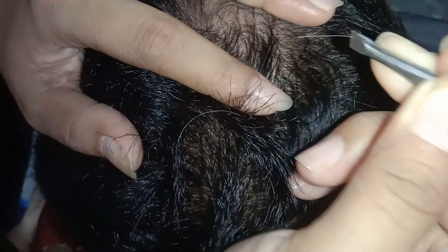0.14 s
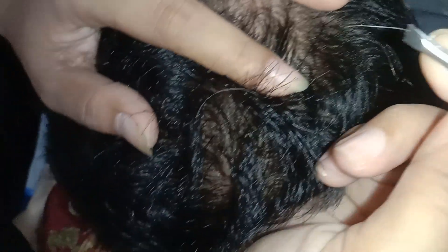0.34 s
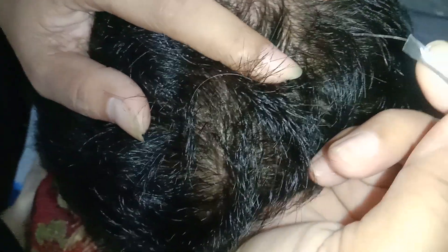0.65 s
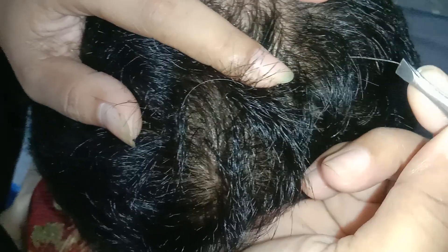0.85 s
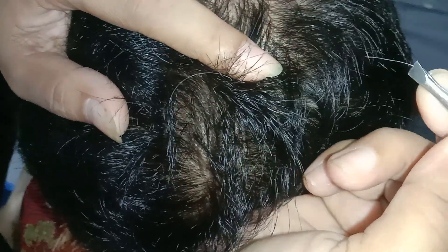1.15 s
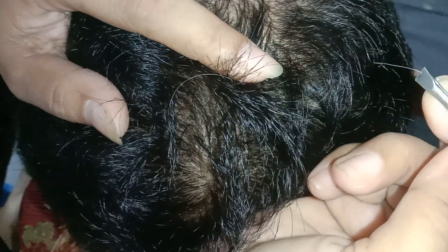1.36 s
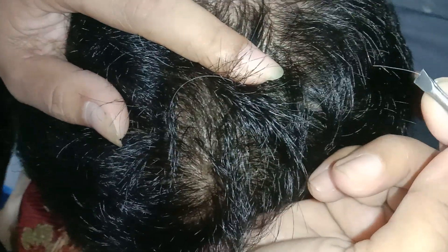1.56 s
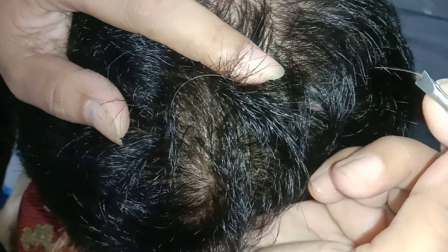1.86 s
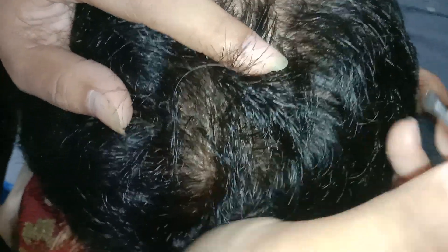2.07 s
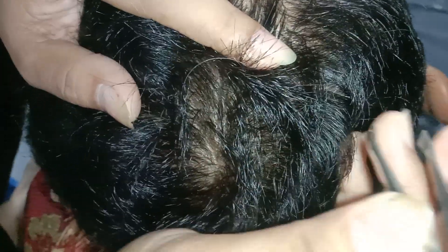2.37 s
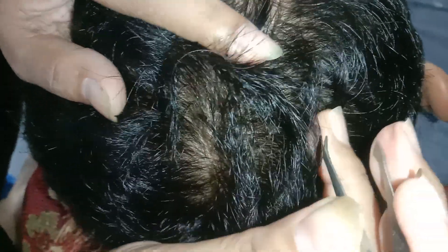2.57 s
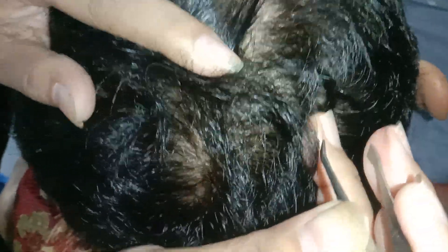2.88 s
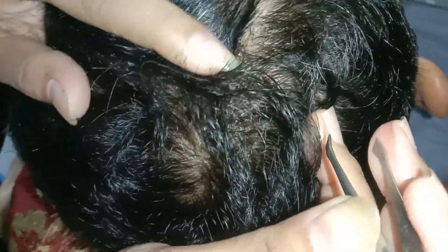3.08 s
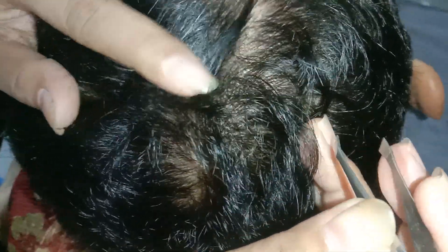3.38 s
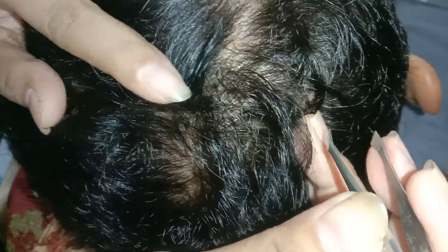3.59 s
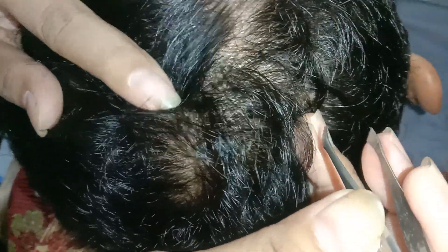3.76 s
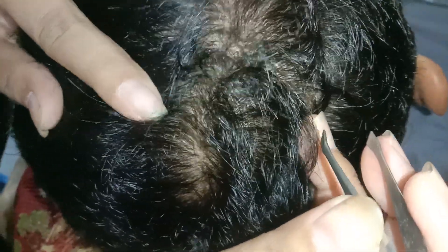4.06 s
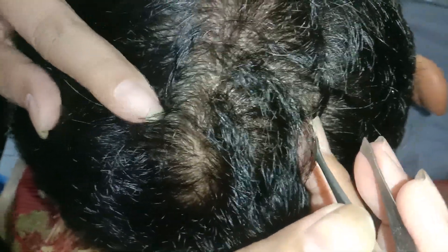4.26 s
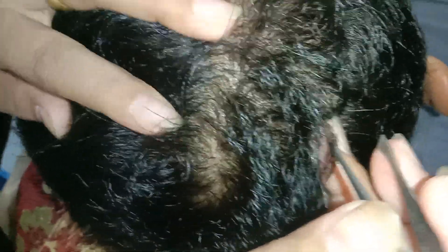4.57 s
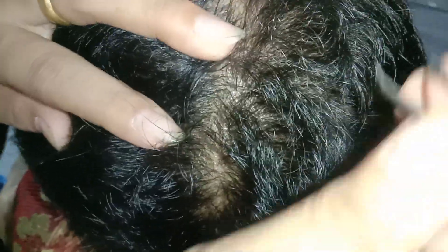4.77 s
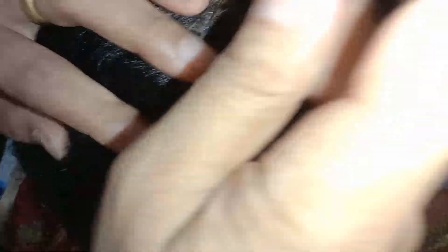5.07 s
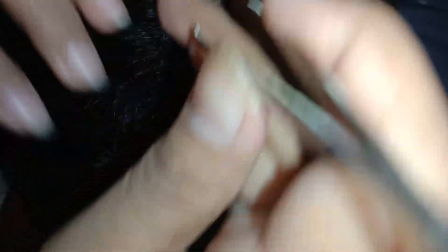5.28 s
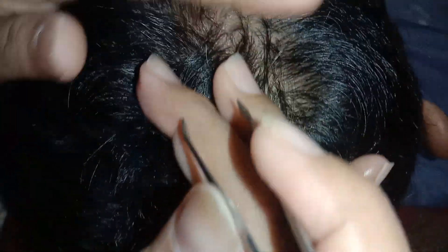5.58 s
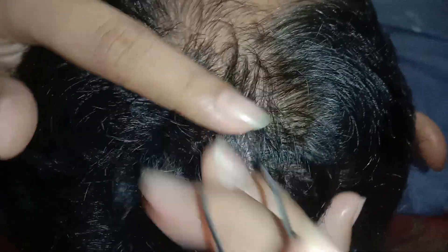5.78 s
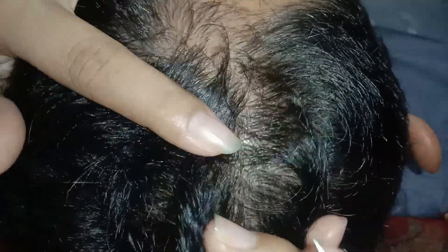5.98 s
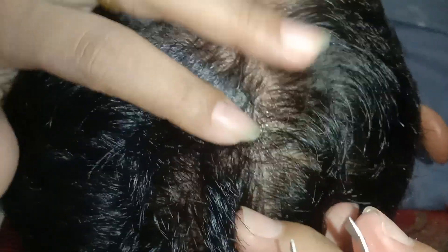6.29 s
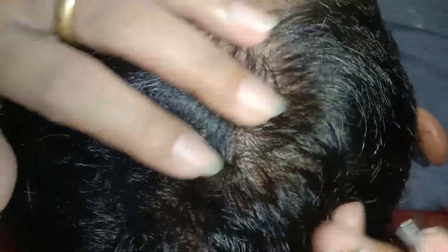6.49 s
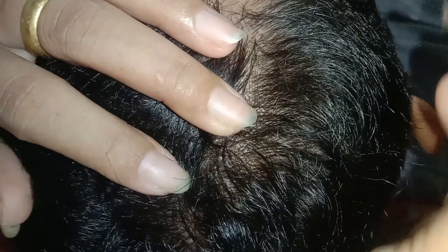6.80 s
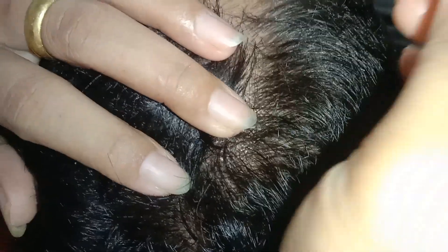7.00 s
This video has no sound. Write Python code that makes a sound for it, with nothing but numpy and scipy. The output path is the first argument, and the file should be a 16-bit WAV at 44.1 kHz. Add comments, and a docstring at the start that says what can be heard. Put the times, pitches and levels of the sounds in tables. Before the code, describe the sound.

Several small birds chirp and whistle in dense, quick bouts of high gliding notes, some pure, some hoarse. A distant rooster crows once between one and three seconds, its voice breaking at the end. Traffic rumbles low and lumpy far away, with dull soft knocks mostly in the second half. Sounds like just outside a bare, echoing room; the microphone's noise suppression makes the pauses sink almost to silence.

```python
"""Just outside a bare, echoing room: small birds chatter in quick gliding notes; a rooster crows once far away.
Under them lie a lumpy low rumble of distant traffic, a swell of deep hum and a faint wavering whine, with dull
knocks, two brief soft tones and a longer steady whistle under the crow's first syllable. Voices are sine
partials, some with hiss, in a sparse-tap echo; rumble, whine and knocks are shaped noise, the hum a sine.
A noise suppressor and a band limit end the chain."""
import sys
import numpy as np
from scipy import signal
from scipy.fft import rfft, irfft
from scipy.io import wavfile
from scipy.ndimage import uniform_filter1d

SR = 44100
rng = np.random.default_rng(int(sys.argv[2]) if len(sys.argv) > 2 else 0)


def master_out(mix):
    """Clip the mix to full scale and print it as 16-bit PCM to the path in sys.argv[1]."""
    frames = np.transpose(np.atleast_2d(mix))
    ceiling = np.clip(frames, -1, 1)
    pcm = np.round(ceiling * 32767).astype(np.int16)
    wavfile.write(sys.argv[1], SR, pcm)


N = 314874


def amp(db):
    """Decibels to gain."""
    return 10 ** (np.asarray(db) / 20)


def evened(x):
    """Scales to rms 1."""
    return x / np.sqrt(np.mean(x ** 2) + 1e-20)


def read(points, hz):
    """Reads a table on a log-frequency axis."""
    point_hz, value = np.transpose(points)
    return np.interp(np.log(hz + 1), np.log(point_hz + 1), value)


def along(rows, t_s):
    """Reads every column of a curve at times t_s."""
    row_s, *columns = np.transpose(rows)
    return [np.interp(t_s, row_s, column) for column in columns]


def add(mix, start_s, sound):
    """Mixes a sound in at start_s."""
    part = mix[max(round(start_s * SR), 0):][:len(sound)]
    part += sound[:len(part)]


def wander(hz):
    """Random drift of rms 1: noise rolled off above about hz."""
    f_hz = np.fft.rfftfreq(N, 1 / SR)
    spectrum = rfft(rng.standard_normal(N)) / (1 + (f_hz / hz) ** 2)
    return evened(irfft(spectrum, N))


def coloured(points):
    """Steady noise of rms 1 with the given spectrum."""
    gain = amp(read(points, np.fft.rfftfreq(N, 1 / SR)))
    return evened(irfft(rfft(rng.standard_normal(N)) * gain, N))


def room(x, direct_db, gap_s):
    """Direct sound plus sparse taps of random sign; the tail builds over gap_s, each band dying at its own speed."""
    # reverberation time: band_hz, t60_s
    decay = [(700, 0.37), (2000, 0.58), (4000, 0.59), (7000, 0.44), (14000, 0.34)]
    step = 12  # samples, one tap in each
    taps = np.zeros(SR)
    at = np.arange(0, SR - step, step)
    taps[at + rng.integers(0, step, len(at))] = rng.choice([-1., 1.], len(at))
    band_hz, t_s, bands = signal.stft(taps, SR, nperseg=256)
    fade = amp(-60 * t_s / read(decay, band_hz)[:, None])
    tail = signal.istft(bands * fade, SR, nperseg=256)[1]
    tail *= 1 - np.exp(-np.arange(len(tail)) / SR / gap_s)
    echo = signal.fftconvolve(x, tail / np.linalg.norm(tail))[:N]
    return amp(direct_db) * x + echo


def quiet_air():
    """Steady broadband noise."""
    # air spectrum, relative: band_hz, density_db
    air_spectrum = [(20, -36), (110, -8.5), (400, -20), (1500, -24.5), (2200, -21), (5500, -20.5),
                    (7000, -31.5), (15400, -74.5)]
    return amp(-65.5) * coloured(air_spectrum)


def traffic_rumble():
    """Low noise in several spectral lumps; its level follows a curve plus a quick random drift."""
    # rumble level before the drift: time_s, level_db
    swell = [(0.0, -64), (0.44, -62.5), (1.11, -69), (1.37, -62), (2.15, -63.5), (2.86, -58.5),
             (3.02, -62.5), (3.88, -61), (3.98, -69.5), (4.16, -58.5), (4.57, -64.5), (5.87, -59.5),
             (6.66, -61), (6.84, -57), (7.14, -65.5)]
    # band_hz, density_db
    lumps = [(40, -38), (80, 4.5), (105, -16.5), (135, 4.5), (170, -0.5), (250, -11.5),
             (310, -10.0), (420, -26.0), (900, -45)]
    level_db = along(swell, np.arange(N) / SR)[0] + 1.84 * wander(16.0)
    return amp(level_db) * coloured(lumps)


def deep_hum(start_s=3.335, length_s=1, pitch_hz=65.9, peak_db=-54, edge_db=-23):
    """A low sine under one arch of level, edge_db weaker at both ends."""
    t_s = np.arange(N) / SR
    away = 2 * (t_s - start_s) / length_s - 1  # -1 to 1 across the swell
    level = amp(peak_db + edge_db * away ** 2) * (abs(away) < 1)
    return np.sqrt(2) * level * np.sin(2 * np.pi * pitch_hz * t_s)


def whine():
    """Narrow-band noise whose level wavers at random."""
    # band_hz, density_db
    narrow = [(1100, -41), (1250, -7.5), (1277, -6.0), (1305, -16), (1450, -66)]
    return amp(-76.5 + 4.9 * wander(4.2)) * coloured(narrow)


def knocks(attack_s=0.0073, t60_s=0.37):
    """Short close puffs of dull noise: soft attack, exponential decay."""
    # soft dull knocks: start_s, level_db (before the attack)
    hits = [(0.499, -68), (3.713, -62), (3.882, -60.5), (4.0, -59), (5.28, -60.5), (5.5, -65), (5.995, -63)]
    out, t_s = np.zeros(N), np.arange(4000) / SR
    # band_hz, density_db
    dull = coloured([(80, -4), (250, -11), (600, -17.5), (1200, -9), (2000, -28), (6000, -72.5)])
    for start_s, level_db in hits:
        decay = amp(level_db - 60 * t_s / t60_s)
        out[round(start_s * SR):][:len(t_s)] = decay * (1 - np.exp(-t_s / attack_s))
    return out * dull


def rooster():
    """A pitch and its octave; strong-weak pulses add a line half-way between; roughness shakes the pitch."""
    # one curve a syllable, levels before the room: time_s, pitch_hz, level_db, octave_db
    syllables = [
        [(1.22, 671, -78, -57), (1.28, 865, -60.5, -60), (1.37, 882, -57, -63), (1.46, 872, -70, -85)],
        [(1.57, 651, -64, -64), (1.65, 900, -52.5, -56), (2.0, 908, -54.5, -59.5), (2.16, 840, -68, -64)],
        [(2.23, 747, -71, -59), (2.3, 781.7, -55, -57.5), (2.54, 799.2, -60, -56.5), (2.66, 819.6, -68.5, -54),
         (2.8, 856, -64.5, -62), (2.93, 824.5, -63.5, -64), (3.0, 682, -65.5, -73)],
    ]
    # steady roughness of each syllable: roughness (0-1)
    syllable_rough = [0.22, 0.334, 0.042]
    scoop_s, scoop_rough = 0.029, 0.27  # each syllable starts rougher
    half_db = -61  # half-way line at full roughness
    break_s, break_length_s, break_db = 2.66, 0.273, -59.5  # the voice breaks: half-way line comes up
    out, shake = np.zeros(N), wander(145)
    for rows, steady_rough in zip(syllables, syllable_rough):
        t_s = np.arange(rows[0][0], rows[-1][0], 1 / SR)
        pitch_hz, level_db, octave_db = along(rows, t_s)
        rough = steady_rough + scoop_rough * np.exp(-(t_s - t_s[0]) / scoop_s)
        inside_s = np.minimum(t_s - break_s, break_s + break_length_s - t_s)
        broken = np.clip(inside_s / 0.012, 0, 1)
        half = amp(half_db) * rough + amp(break_db) * broken
        shaken_hz = pitch_hz * (1 + 0.132 * rough * shake[(t_s * SR).astype(int)])
        turn = 2 * np.pi * np.cumsum(shaken_hz) / SR
        call = amp(level_db) * np.sin(turn)
        call += amp(octave_db) * np.sin(2 * turn)
        call += half * np.sin(3 * turn / 2)
        call += amp(octave_db - 36.0) * np.sin(3 * turn)
        add(out, t_s[0], np.sqrt(2) * call * signal.windows.tukey(len(t_s), .08))
    return room(out, direct_db=-4.5, gap_s=0.0034)


def soft_tones():
    """Soft steady sines, each swelling and fading: two brief, one longer under the crow's first syllable."""
    # soft pure tones, before the room: start_s, length_s, pitch_hz, level_db
    tones = [(0.173, 0.058, 644, -64), (1.204, 0.31, 1540, -63.5), (6.455, 0.032, 1162, -54)]
    out = np.zeros(N)
    for start_s, length_s, pitch_hz, level_db in tones:
        t_s = np.arange(0, length_s, 1 / SR)
        tone = np.sqrt(2) * amp(level_db) * np.sin(2 * np.pi * pitch_hz * t_s)
        add(out, start_s, tone * np.hanning(len(t_s)))
    return out


def songbirds(shake=0.0509, settle=1.6):
    """Each note is a glide with overtones; a hoarse note shakes and hisses more; three perches echo differently."""
    # one row a note, levels before the room: start_s, length_s, start_hz, end_hz, level_db, hoarse_db
    notes = [(0, 0.005, 2960, 3000, -30, 0.5), (.045, 0.018, 3486, 2235, -40, -17),
             (.066, .025, 2290, 4160, -39, -11.5), (.1, 0.026, 2403, 2240, -46, -11),
             (.005, 0.048, 5910, 5530, -39, -25), (.011, 0.0575, 5160, 4740, -33.5, -10),
             (.043, .13, 2950, 5910, -39, -26), (.083, 0.069, 3270, 6710, -37.5, -25.5),
             (.102, 0.026, 4020, 4180, -62, -26), (.194, 0.052, 5670, 5900, -44, -1),
             (.288, 0.03, 3080, 2844, -44, -7.5), (.325, 0.039, 2385, 2330, -45.5, -7),
             (.287, .027, 5540, 5890, -35.5, -16), (.3, 0.068, 7500, 6800, -49, -28),
             (.371, 0.0685, 3580, 3760, -44, -4.5), (.4, 0.0154, 3090, 2710, -43, 0),
             (.415, 0.036, 4100, 4470, -45, -11), (.513, 0.0707, 2880, 2666, -44.5, -4.5),
             (.519, .023, 2030, 1970, -40, -2), (.52, 0.097, 5940, 5350, -44, -11.5),
             (.58, .06, 4760, 5030, -44, -6.5), (.61, 0.048, 3120, 3500, -49, -21.5),
             (.713, 0.043, 3500, 3708, -56, 11.5), (.722, 0.06, 2750, 2785, -55, -14.5),
             (.72, 0.044, 6850, 7520, -54, -22), (.803, .025, 2030, 1753, -50.5, -6),
             (.82, 0.019, 7600, 7030, -60.5, -31), (1.073, 0.031, 2820, 2620, -60, -26),
             (1.108, 0.071, 2560, 2280, -55, -4.5), (1.152, 0.13, 3620, 3830, -55.5, -7.5),
             (1.215, 0.052, 4780, 4780, -49, -6), (1.375, 0.064, 2250, 2347, -44.5, -8),
             (1.413, 0.0856, 2980, 2747, -37.5, -7), (1.471, .072, 3710, 4720, -41, -39),
             (1.497, 0.089, 3920, 3576, -40.5, -16), (1.567, 0.016, 4310, 4320, -33, -13),
             (1.674, 0.041, 4310, 4270, -44.5, -8.5), (1.674, 0.1, 4940, 4970, -50, -2),
             (1.778, 0.039, 3230, 3970, -43.5, -24), (1.839, 0.055, 3910, 2046, -45, 0.5),
             (1.857, 0.052, 2820, 2406, -50.5, -13.5), (1.86, .069, 6120, 5340, -41, -10),
             (1.909, 0.023, 2330, 2283, -33.5, -9), (1.961, .084, 3350, 4670, -44, 3),
             (1.987, 0.035, 6500, 6590, -31.5, -15), (2.101, 0.037, 2110, 3400, -51, -30),
             (2.106, 0.041, 5450, 5790, -44, -20), (2.115, 0.044, 2110, 2160, -42, -1.5),
             (2.324, 0.047, 2750, 2867, -44.5, -6.5), (2.336, 0.036, 3840, 5450, -40.5, -1),
             (2.347, .085, 3620, 7400, -41.5, -7.5), (2.35, .026, 2540, 2164, -50.5, -20),
             (2.365, 0.02, 7590, 6330, -37.5, -7.5), (3.244, .047, 3640, 3483, -55.5, -13),
             (3.24, .06, 7600, 6560, -53, -9), (3.295, .08, 5750, 4500, -47, -1),
             (3.375, 0.022, 2500, 2590, -38.5, -10), (3.389, .082, 4850, 3620, -37, -16.5),
             (3.413, 0.036, 3580, 2960, -37.5, -14), (3.445, 0.03, 3170, 3126, -33.5, -41),
             (3.456, .069, 4560, 6280, -40.5, -18), (3.459, 0.0395, 4290, 4870, -34.5, -13),
             (3.488, 0.05, 2430, 2306, -46, -25), (3.525, 0.046, 3980, 3847, -36, -22),
             (3.55, .07, 3980, 4850, -38.5, -14), (3.555, 0.089, 2860, 2840, -43, -4.5),
             (3.607, 0.051, 5120, 5070, -36.5, -11), (3.69, .03, 2480, 2157, -37, -15),
             (3.715, 0.029, 2156, 2079, -37, -15), (3.742, 0.025, 2733, 2820, -36.5, 1),
             (3.8, 0.032, 5890, 6040, -51, -8.5), (3.706, 0.0355, 6930, 7480, -45.5, -23),
             (3.871, .069, 2010, 2400, -59.5, -4), (3.912, 0.0484, 4010, 4394, -40, -6.5),
             (3.923, 0.038, 2670, 2710, -48.5, -4.2), (4.109, 0.1, 3580, 4360, -53, -7.5),
             (4.112, 0.032, 2720, 1915, -56.5, 11.5), (4.161, 0.056, 3400, 2942, -36, -9.5),
             (4.17, .05, 6660, 6280, -40, -14), (4.211, 0.043, 5870, 5875, -32.5, -15.5),
             (4.282, 0.037, 2232, 2180, -46.5, -6), (4.295, 0.019, 5400, 4560, -37, -0.5),
             (4.307, 0.017, 6500, 6610, -37, -36), (4.359, .047, 2240, 4760, -42.5, -12.5),
             (4.365, 0.026, 3850, 3980, -57.5, -27), (4.452, 0.045, 3280, 3187, -49.5, -4.5),
             (4.695, .05, 2550, 2570, -61.5, -6.5), (4.74, 0.044, 2530, 3204, -60, -22.5),
             (4.805, 0.037, 4050, 3980, -65, -25), (4.852, 0.043, 1997, 4130, -59, -28),
             (4.885, 0.025, 7400, 6960, -67, -14.5), (4.89, 0.044, 3600, 4590, -56.5, -3),
             (4.942, 0.063, 3000, 2770, -51, -25), (4.957, 0.13, 7460, 5690, -51, -9),
             (4.971, .049, 2750, 3024, -49, -9.5), (5.015, 0.067, 5050, 6950, -36.5, -17),
             (5.021, .046, 5980, 6980, -51, -4), (5.03, 0.066, 4480, 4110, -45.5, -25.5),
             (5.085, 0.04, 2280, 2226, -57, -5.5), (5.09, 0.041, 4940, 4980, -38, -3.5),
             (5.155, 0.046, 1970, 4020, -49.5, 8), (5.174, 0.046, 4440, 4850, -41, -5),
             (5.18, 0.069, 6370, 4730, -48.5, -22), (5.395, 0.078, 3750, 2940, -51.5, -23),
             (5.44, 0.078, 2950, 2250, -47.5, -64), (5.495, 0.066, 2285, 2130, -46, -50.5),
             (5.531, .069, 3590, 4810, -38.5, -9.5), (5.59, 0.0836, 3020, 2810, -44, -33),
             (5.592, 0.11, 5430, 6020, -39.5, -7), (5.616, 0.17, 5960, 5570, -43, -15),
             (5.659, 0.013, 6500, 6730, -39, -20), (5.665, .064, 5840, 6440, -35.5, -6),
             (5.682, 0.027, 2190, 2000, -42, -11), (5.732, 0.058, 3183, 3118, -39.5, -15.5),
             (5.758, 0.0336, 7010, 6520, -36, -5), (5.833, 0.042, 5170, 5226, -30, -17),
             (5.86, 0.0464, 5300, 5570, -46, -9.5), (6.022, 0.046, 3434, 3020, -54.5, 0),
             (6.138, .053, 4760, 5210, -50, -12), (6.144, 0.025, 6330, 6610, -54, -1),
             (6.147, .049, 5670, 5690, -48.5, -12), (6.245, .05, 4615, 5940, -34, -23),
             (6.265, 0.056, 5610, 6940, -39, -25.5), (6.3, 0.054, 5900, 5850, -45.5, -19),
             (6.318, 0.023, 2960, 2976, -37, -8.5), (6.33, .056, 5090, 5560, -38, -12),
             (6.3, .09, 6830, 6700, -40, -21.5), (6.39, 0.022, 2910, 2440, -43, -4),
             (6.415, .07, 2384, 2358, -39.5, -22.5), (6.393, 0.0335, 3400, 3200, -40.5, -2),
             (6.431, 0.0457, 4760, 4972, -33.5, -7.5), (6.489, 0.03, 2250, 2220, -52, -14.5),
             (6.665, 0.027, 1980, 2012, -47, -2.5), (6.69, 0.0357, 2015, 2600, -42, -5.5),
             (6.681, 0.037, 5220, 6140, -41.5, -4), (6.72, 0.04, 2640, 4076, -45.5, 3),
             (6.904, .069, 5590, 6570, -34.5, -29), (6.91, 0.037, 6250, 6830, -51, -13),
             (6.916, 0.0134, 5090, 5340, -34.5, -18.5), (6.962, .03, 2190, 2130, -61.5, -12),
             (6.98, 0.024, 2960, 3015, -38.5, -11), (7.003, 0.024, 6720, 6660, -34.5, -11.5),
             (7.03, 0.073, 2800, 3044, -46.5, -3), (7.07, 0.049, 5100, 4970, -34, -11.5)]
    # hiss spectrum, relative: band_hz, density_db
    hiss_spectrum = [(1300, -23.5), (1900, -4), (3000, 8.5), (6000, 3), (7500, -6), (11000, -14),
                     (15000, -20)]
    # how the open beak passes each partial: partial_hz, gain_db
    beak = [(1800, 1.5), (3000, 3), (5500, 4.5), (7500, -3.5), (11000, -6), (13000, -17), (16000, -39.5)]
    overtone_step_db = -4.5  # each overtone leaves the throat this much weaker, before hoarseness
    overtone_per_hoarse = 0.15  # dB per dB: pure notes are poorer in overtones
    hiss_db = -1  # hiss against hoarseness
    shaky, hiss = wander(326), coloured(hiss_spectrum)
    orders = np.arange(1, 5)[:, None]
    perch = np.zeros((3, N))
    for k, (start_s, length_s, start_hz, end_hz, level_db, hoarse_db) in enumerate(notes):
        at = max(round(start_s * SR), 0)
        n = min(round(max(length_s, .005) * SR), N - at)
        glide = 1 - np.linspace(1, 0, n) ** settle  # slows and settles on the last pitch
        path_hz = start_hz * (end_hz / start_hz) ** glide
        depth = 0.0088 + shake * min(amp(hoarse_db), 1)
        shaken_hz = path_hz * (1 + depth * shaky[at:at + n])
        turn = 2 * np.pi * np.cumsum(shaken_hz) / SR
        throat_db = (overtone_step_db + overtone_per_hoarse * hoarse_db) * (orders - 1)
        beak_db = read(beak, orders * path_hz) - read(beak, path_hz)
        levels = amp(throat_db + beak_db)
        audible = orders * shaken_hz < SR / 2  # no aliasing
        tone = (levels * np.sin(orders * turn) * audible).sum(axis=0)
        breath = amp(hoarse_db + hiss_db) * np.linalg.norm(levels, axis=0) * hiss[at:at + n]
        voice = np.sqrt(2) * tone + breath
        add(perch[k % 3], start_s, amp(level_db) * voice * signal.windows.tukey(n, .9))
    perch[0] += soft_tones()  # these share the first perch's echo
    return sum(room(p, direct_db=-9, gap_s=0.0022) for p in perch)


def scene():
    """All sources, one channel."""
    background = quiet_air() + traffic_rumble() + deep_hum() + whine()
    return (background + knocks() + rooster() + songbirds())[None]


def record(dry, margin_db=-1.5, gate_db=-56, steep=0.66, edge_hz=15530):
    """A noise suppressor lowers bands near their own quiet level, and all bands in pauses; then a band limit."""
    bands = signal.stft(dry, nperseg=512, noverlap=384)[2]
    power = uniform_filter1d(abs(bands) ** 2, size=7, axis=2)  # smoothed in time
    power = uniform_filter1d(power, size=5, axis=1)  # and across bands
    quiet = amp(2 * margin_db) * np.percentile(power, 15, axis=2, keepdims=True)
    band_gain = np.maximum(power / (power + quiet), .4)
    # the pause detector listens above 600 Hz
    loud_db = 10 * np.log10(power[:, 7:].sum(axis=1, keepdims=True) + 1e-12)
    pause_gain = amp(steep * np.clip(loud_db - gate_db, -14, 0))
    kept = signal.istft(bands * pause_gain * band_gain, nperseg=512, noverlap=384)[1][:, :N]
    low_pass = signal.firwin(511, edge_hz, window=("kaiser", 9), fs=SR)
    return signal.oaconvolve(kept, low_pass[None], "same")


dry = scene()
out = record(dry)
master_out(out)
```